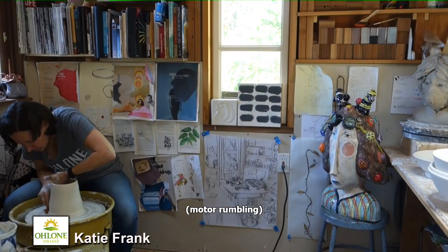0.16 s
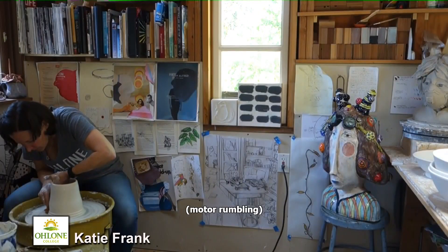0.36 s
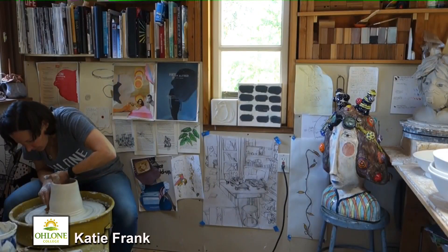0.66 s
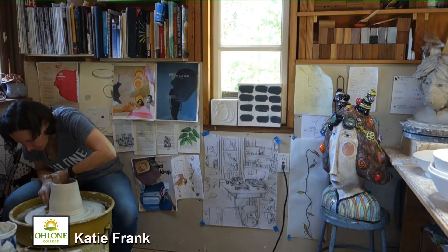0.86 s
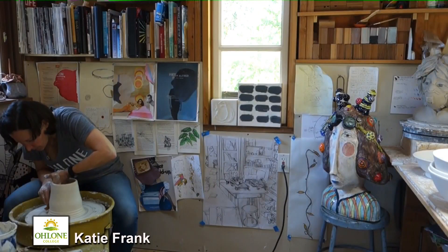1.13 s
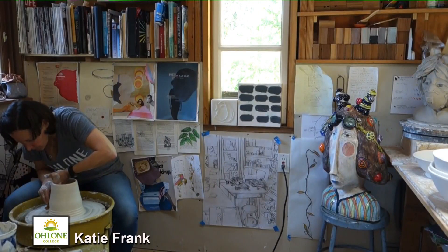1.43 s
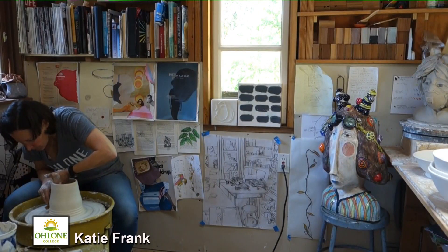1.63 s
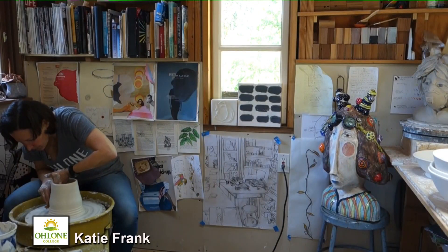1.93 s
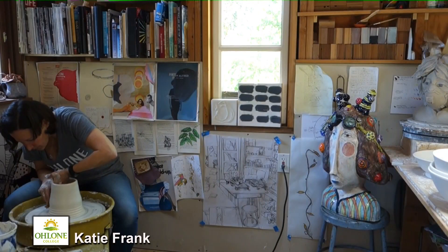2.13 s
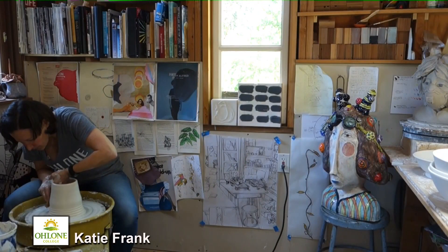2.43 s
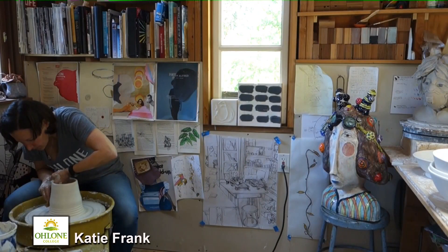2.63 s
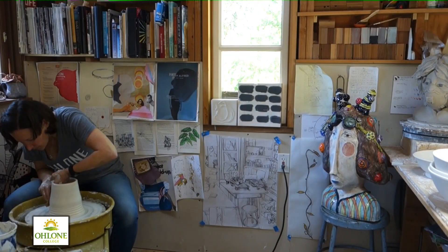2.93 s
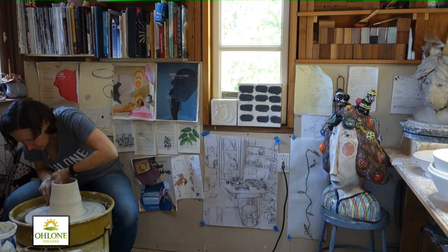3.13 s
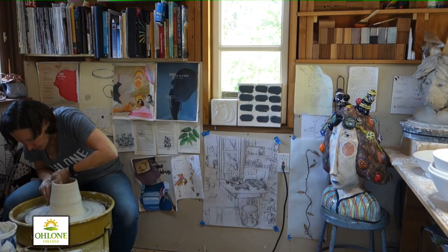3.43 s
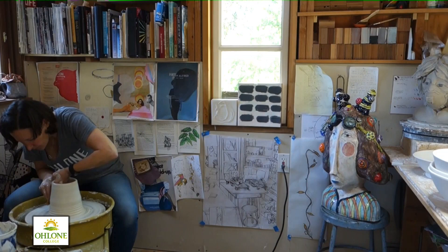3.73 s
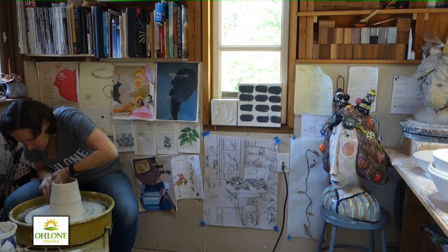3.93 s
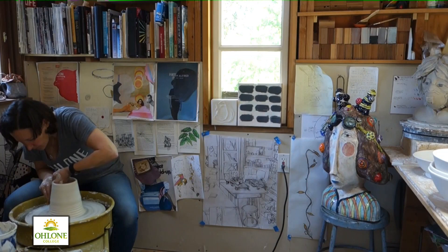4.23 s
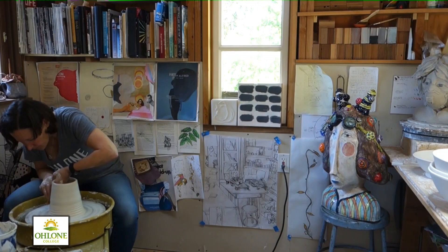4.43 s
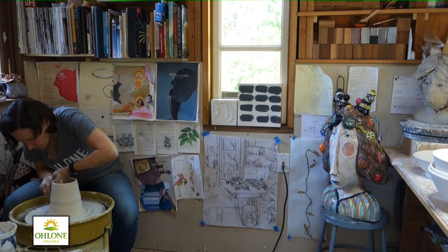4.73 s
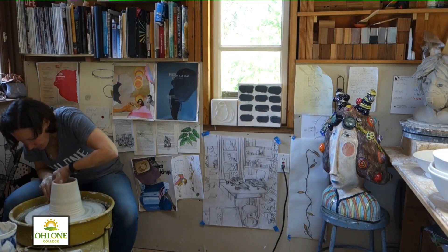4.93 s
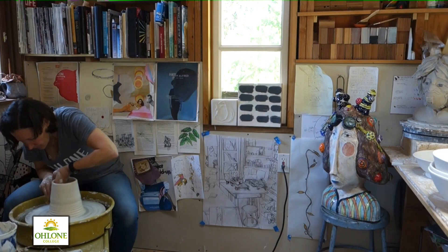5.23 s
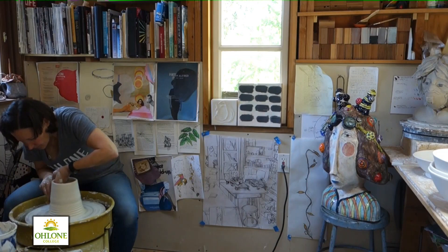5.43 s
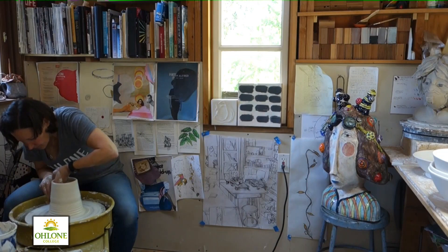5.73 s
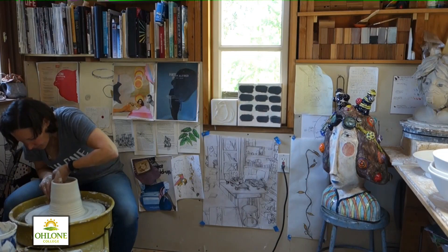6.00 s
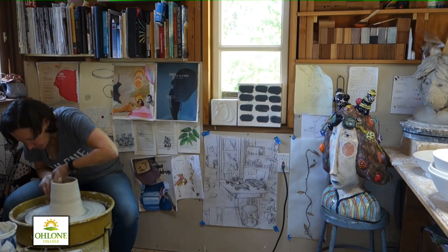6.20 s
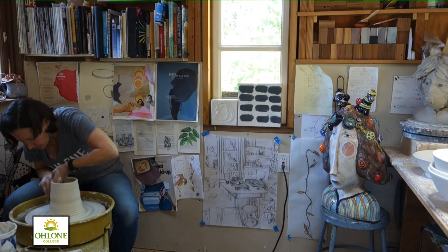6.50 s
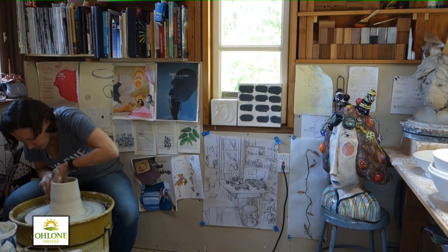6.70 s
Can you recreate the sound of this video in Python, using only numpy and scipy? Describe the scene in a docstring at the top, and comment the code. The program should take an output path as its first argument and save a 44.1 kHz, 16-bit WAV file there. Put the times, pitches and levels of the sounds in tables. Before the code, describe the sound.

Constant deep mains-like drone of an electric pottery wheel in a small studio, gently throbbing, with barely audible hiss of wet clay being shaped.

```python
"""A motor under a potter's wheel buzzes at twice the mains frequency: a sum of overtones that throb
with the motor shaft and sway with the wheel head, in a small studio at steady speed.
Shaft and belt add weak wavering tones; the frame rumbles and bearings whirr as coloured noise.
Wet clay hisses and swishes as shaped noise, and chirps under the fingers as short rough tones."""
import sys
import numpy as np
from scipy import signal
from scipy.fft import rfft, irfft, next_fast_len
from scipy.io import wavfile

SR = 44100
rng = np.random.default_rng(int(sys.argv[2]) if len(sys.argv) > 2 else 0)


def to_wav(sig):
    """Store sig (one row per channel, or 1-D mono) as 16-bit WAV at the path in sys.argv[1].

    Samples outside -1..1 are clipped; the rate is SR.
    """
    pcm = np.clip(np.atleast_2d(sig), -1, 1) * 32767
    pcm = np.round(pcm).astype(np.int16)
    wavfile.write(sys.argv[1], SR, pcm.T)  # frames by channels


N = 302526
TIME = np.arange(N) / SR  # s
BUZZ_HZ, SHAFT_HZ, WHEEL_HZ = 119.964, 9.59, 1.046


def from_db(db):
    """Decibels to amplitude gain."""
    return 10 ** (np.asarray(db) / 20)


def at_hz(points, hz):
    """Interpolate a (hz, value) table on a log-frequency axis."""
    points_hz, values = np.array(points)[:, :2].T
    return np.interp(np.log(hz), np.log(points_hz), values)


def drift(corner_hz):
    """Random drift of spread 1: coarse noise through two equal one-pole low-passes."""
    step = 40  # samples per coarse point
    pole = np.exp(-2 * np.pi * corner_hz * step / SR)
    coarse = rng.standard_normal(N // step + 2002)
    slow = signal.lfilter([1], [1, -2 * pole, pole * pole], coarse)[2000:]  # drop the run-in
    return np.interp(np.arange(N) / step, np.arange(len(slow)), slow / slow.std())


def bell(middle_s, length_s):
    """Gaussian swell of height 1; length_s spans its 1/e points."""
    return np.exp(-(2 * (TIME - middle_s) / length_s) ** 2)


# left-right phase at two microphone ports: hz, left_lead_rad
LEAD = [(60, .08), (120, .14), (500, .25), (860, .6), (1290, .5), (1640, 0.), (1980, 2.3), (2760, 3.5)]
# left-right level at the ports: hz, left_minus_right_db
LEAN = [(60, 0.0), (110, 0.0), (200, -0.5), (350, 0.5), (640, 0.5), (1160, -2.5), (2090, -1.0),
        (3790, -2.0), (6840, -0.5), (12400, -0.5)]


def ports(hz):
    """Complex left and right gains: level and phase differences split evenly between the ports."""
    left = from_db(at_hz(LEAN, hz) / 2) * np.exp(0.5j * at_hz(LEAD, hz))
    return np.array([left, 1 / left])


# noise shared by the ports: hz, likeness (clipped to 0-1 in use)
LIKENESS = [(130, 1.5), (300, 0.5), (600, 0.72), (1200, 1), (1900, .5), (2800, 0.06), (5000, -0.1),
            (12000, -0.46)]


def noise(spectrum, peaks):
    """Stereo noise shaped by a spectrum and resonances, partly alike at both ports."""
    size = next_fast_len(N)
    hz = np.maximum(np.arange(size // 2 + 1) * SR / size, 1)
    level_db = at_hz(spectrum, hz)
    for peak_hz, width_hz, peak_db in peaks:
        level_db = level_db + peak_db / (1 + (2 * (hz - peak_hz) / width_hz) ** 2)
    inside = (hz > spectrum[0][0] / 2) & (hz < spectrum[-1][0])
    shared, left, right = rfft(rng.standard_normal((3, size)))
    alike = np.clip(at_hz(LIKENESS, hz), 0, 1)
    both = np.sqrt(alike) * shared + np.sqrt(1 - alike) * np.array([left, right])
    mid_loss = np.sqrt((1 + alike) / 2)  # unlike channels lose level in their sum
    gain = from_db(level_db) * inside * np.sqrt(SR / 2) / mid_loss
    return irfft(both * ports(hz) * gain, size)[:, :N]


# room air and microphone hiss: hz, level_db_per_hz
AIR = [(3500, -112), (4800, -108), (6500, -108.3), (8500, -109), (10000, -109), (11000, -110),
       (12000, -109), (12300, -113), (12900, -113)]


def air():
    """Steady broadband noise of room air and microphones."""
    return noise(AIR, [])


# frame rumble: hz, level_db_per_hz
RUMBLE = [(20, -100), (40, -78), (55, -72), (90, -75.5), (150, -74), (290, -74.5), (435, -75), (560, -74.5),
          (690, -74), (800, -84.5), (1000, -86.5), (1400, -81.5), (1700, -91), (2000, -99)]
# frame and splash pan resonances, negative = dip: hz, width_hz, over_rumble_db
FRAME = [(111, 47, 5.5), (237, 24, 1.5), (324.4, 7, 8), (360, 17, 10), (463.4, 14.4, 9.5), (504, 7, 2.5),
         (615, 51, 3.5), (721, 16, 8), (838, 18, 6.5), (1092, 44, 5), (1174, 30, 12.5), (1230, 25, 8),
         (1295, 23, 8.5), (1380, 21, -4), (1490, 35, -6), (1220, 12, -9.5), (1254, 28, -2), (428, 14, -4),
         (50, 7.2, 4), (1570, 16, 4), (1836, 72, 10.5)]


def frame_rumble():
    """Noise through frame and pan resonances, pulsing twice a shaft turn."""
    pulse_db = 0.5 * np.cos(2 * np.pi * 2 * SHAFT_HZ * TIME - 1.5)
    return noise(RUMBLE, FRAME) * from_db(pulse_db)


# bearing whirr and rubbing: hz, settled_level_db_per_hz
WHIRR = [(1900, -89.5), (2300, -91.5), (2650, -101), (3300, -102), (4400, -103), (4800, -113), (5600, -125)]
# whirr resonances: hz, width_hz, over_whirr_db
WHIRR_PEAKS = [(2924, 45, 6.5), (2230, 140, 0.5), (4300, 130, 2)]
WHIRR_START_DB, WHIRR_SETTLE_S = 2.5, 0.3


def bearing_whirr():
    """Rubbing noise that starts a little louder, settles and flickers."""
    settle_db = WHIRR_START_DB * np.exp(-TIME / WHIRR_SETTLE_S)
    flicker_db = 0.56 * drift(30.0) + 0.84 * drift(4.7)
    return noise(WHIRR, WHIRR_PEAKS) * from_db(settle_db + flicker_db)


# shaft, belt and mains side tones: pitch_hz, level_db (rms)
TONES = [(33.6, -64), (47.8, -59.6), (57.9, -65), (59.9, -66), (67.3, -68), (105.6, -53.7), (153.4, -67),
         (163.5, -63), (306.8, -61.7), (316.9, -60.5), (326.4, -63), (350.6, -58), (419.9, -67),
         (460.3, -60.7), (502.7, -64), (539.7, -68), (580.7, -60), (633.2, -66), (643.3, -65),
         (1060.5, -76), (1113.0, -70), (1180.3, -71), (1225.4, -73), (1294.7, -72), (1533.6, -72)]


def side_tones():
    """Weak sinusoids wavering a little in level and phase."""
    out = np.zeros((2, N))
    for pitch_hz, level_db in TONES:
        gain = np.sqrt(2) * from_db(level_db + 1.2 * drift(1.7))
        phase_rad = 2 * np.pi * (pitch_hz * TIME + rng.random()) + 0.47 * drift(0.92)
        out += np.real(ports(pitch_hz)[:, None] * gain * np.exp(1j * phase_rad))
    return out


# wet clay hiss colour, relative: hz, level_db_per_hz
SLIP = [(5000, -28), (7000, -8), (8800, -14), (9600, -2), (10500, -8), (12900, -11)]
# hiss resonances: hz, width_hz, over_hiss_db
SLIP_PEAKS = [(7600, 310, 6), (9600, 340, 1), (11700, 260, 8)]
# swishes of wet clay past the fingers: middle_s, level_db (rms at the top), length_s
SWISHES = [(.12, -70, .03), (0.648, -66, .03), (.72, -64, .08), (.85, -67, .04), (1.272, -64, .07),
           (2.07, -68, .07), (2.21, -64, .06), (3.15, -65, .03), (3.23, -70, .04), (3.323, -66, .09),
           (3.67, -69, .06), (4.19, -73, .07), (4.51, -69, .04), (4.68, -65, .09), (4.82, -67, .05),
           (4.96, -65, .03), (5.13, -65, .05), (5.99, -71, .1)]
SLIP_DB, SLIP_SWELL_DB, SLIP_FLICKER_DB = -75, 2.5, 1  # steady hiss, rms


def clay_hiss():
    """Wet clay as uneven faint noise, with short swishes added in power."""
    hiss = noise(SLIP, SLIP_PEAKS)
    steady = from_db(SLIP_DB + SLIP_SWELL_DB * drift(1.6) + SLIP_FLICKER_DB * drift(19.0))
    swish = np.zeros(N)
    for middle_s, level_db, length_s in SWISHES:
        swish += from_db(level_db) * bell(middle_s, length_s)
    swish *= from_db(1.7 * drift(15.0))
    return hiss / hiss.std() * np.hypot(steady, swish)


# chirps of fingers on clay: middle_s, pitch_hz, level_db (peak, before lean and roughness), length_s
CHIRPS = [(.115, 2520, -66, .04), (0.21, 2420, -62, .08), (.34, 2280, -64, .03), (1.284, 3060, -61, .03),
          (1.322, 3420, -67, .04), (1.43, 3720, -71, .03), (4.19, 3050, -70, 0.032),
          (4.205, 2720, -68, .02), (4.27, 2230, -68, .03), (5.134, 3040, -59.5, .024)]
CHIRP_LEAN_DB = -7  # left minus right


def finger_chirps():
    """Short soft-edged whistles, roughened by fast level and phase drift."""
    out = np.zeros((2, N))
    rough = from_db(2 * drift(80)) * np.exp(0.5j * drift(40))
    lean_db = np.array([[CHIRP_LEAN_DB / 2], [-CHIRP_LEAN_DB / 2]])
    for middle_s, pitch_hz, level_db, length_s in CHIRPS:
        whistle = np.real(rough * np.exp(2j * np.pi * pitch_hz * TIME))
        out += from_db(level_db + lean_db) * bell(middle_s, length_s) * whistle
    return out


# buzz overtones: multiple, level_db (rms), left_minus_right_db, left_lead_rad,
#   shaft_throb_db, shaft_lag_turns, sway_once_a_wheel_turn_db, once_lag_turns,
#   sway_twice_a_wheel_turn_db, twice_lag_half_turns
BUZZ = [(1.0, -29, -0.2, 0.16, 0, 0.65, 0.23, 0.15, 0.06, 0.57),
        (2.0, -45, -0.4, 0.15, 4, 0.92, -0.3, 0.59, 0.2, 0.73),
        (3.0, -35.5, 0.5, 0.04, 0.56, 0.094, 0, 0.84, 0.5, 0.75),
        (4.0, -40.5, 0, 0.054, 0.5, 0.51, 0, 0.46, 0, 0.85),
        (5.0, -44.5, 1.5, 0.25, 1, 0.37, 0.2, 0.12, 0.7, 0.73),
        (6.0, -60.5, -1.5, 0.18, 8, 0.58, -0.5, 0.7, 1.2, 0.18),
        (7.0, -60.5, -6.5, 0.92, 0.3, 0.71, 3.5, 0.18, 2.5, 0.64),
        (8.0, -68, 5, 0.65, 0.5, 0.2, 4, 0.12, 4.5, 0.62),
        (9.0, -57.0, 4, -0.53, 1.2, 0.87, 2, 0.66, 1, 0.82),
        (10.0, -52.5, -4, 0.64, -0.5, 0.29, 0.5, 0.08, 0.3, 0.26),
        (11.0, -52.5, 0.5, 0.8, 0.5, 1, 1, 0.23, 0.6, 0.61),
        (12.0, -52.5, -8, 0.23, 0.6, 0.9, 0.5, 0.65, 0.1, 0.04),
        (13.0, -59.5, 4.5, -0.29, 1.5, 0.86, 1.0, 0.77, 0, 0.49),
        (14.0, -78, -4, 0.095, -9, 0.54, -1, 0.84, 1, 0.14)]
# brief ducks or swells once a wheel turn: multiple, level_db, lag_turns, width_turns (1/e half width)
NUDGES = [(1, 1.16, 0.34, 0.054), (3, -3, 0.024, 0.089), (3, 0.5, 0.584, 0.022), (5, -1.5, 0.54, 0.095),
          (7, -2, 0.88, 0.03)]
BUZZ_WAVER_DB = 0.36
BUZZ_SPREAD_RAD, BUZZ_TURN_RAD, BUZZ_START_S = 0.94, 3.6, 0.00273
RATTLE_FROM, RATTLE_CENTRE = 10, 11.5  # overtone multiples
RATTLE_SPREAD_RAD, RATTLE_LAG_S = 0.43, 0.0029


def wheel_sway_db(multiple, once_db, once_lag, twice_db, twice_lag):
    """Level of one overtone over the wheel turn, brief nudges included."""
    turns = WHEEL_HZ * TIME
    sway_db = once_db * np.cos(2 * np.pi * (turns - once_lag))
    sway_db += twice_db * np.cos(2 * np.pi * (2 * turns - twice_lag))
    for nudged, nudge_db, lag_turns, width_turns in NUDGES:
        if round(nudged) == multiple:
            from_middle = (turns - lag_turns + 0.5) % 1 - 0.5
            sway_db += nudge_db * np.exp(-(from_middle / width_turns) ** 2)
    return sway_db


def buzz_phase_rad(multiple):
    """Phase of one overtone: low ones spread over the cycle, high ones bunch into a burst."""
    omega = 2 * np.pi * multiple * BUZZ_HZ
    if multiple < RATTLE_FROM:  # the frame spreads the low overtones
        phase = omega * (TIME - BUZZ_START_S) + BUZZ_SPREAD_RAD * multiple ** 2 + BUZZ_TURN_RAD
    else:  # the motor housing rattles in one short burst a cycle
        phase = omega * (TIME - RATTLE_LAG_S) + RATTLE_SPREAD_RAD * (multiple - RATTLE_CENTRE) ** 2
    return phase + 0.01 * multiple * drift(1.5)


def motor_buzz():
    """Current pulses shake the motor; each overtone throbs with shaft and wheel."""
    out = np.zeros((2, N))
    for (multiple, level_db, lean_db, lead_rad, shaft_db, shaft_lag,
         once_db, once_lag, twice_db, twice_lag) in BUZZ:
        multiple = round(multiple)
        throb_db = shaft_db * np.cos(2 * np.pi * (SHAFT_HZ * TIME - shaft_lag))
        sway_db = wheel_sway_db(multiple, once_db, once_lag, twice_db, twice_lag)
        waver_db = BUZZ_WAVER_DB * drift(2.8)
        gain = np.sqrt(2) * from_db(level_db + throb_db + sway_db + waver_db)
        side_gain = from_db([[lean_db / 2], [-lean_db / 2]])
        side_rad = np.array([[lead_rad / 2], [-lead_rad / 2]])
        out += gain * side_gain * np.cos(buzz_phase_rad(multiple) + side_rad)
    return out


def scene():
    """Sum of air, frame, bearings, side tones, clay and motor."""
    machine = frame_rumble() + bearing_whirr() + side_tones() + motor_buzz()
    clay = clay_hiss() + finger_chirps()
    return air() + machine + clay


STOP_HZ = 12974  # 50 dB down from here up


def record(dry):
    """Steep low-pass cuts the top."""
    return signal.sosfilt(signal.cheby2(24, 50, STOP_HZ, fs=SR, output="sos"), dry)


dry = scene()
out = record(dry)
to_wav(out)
```